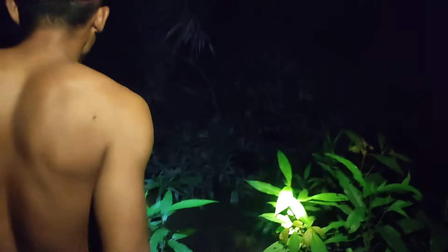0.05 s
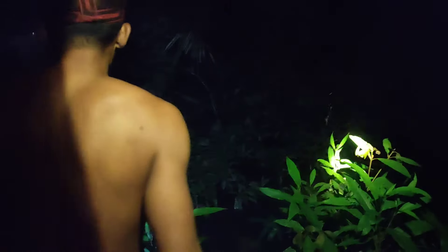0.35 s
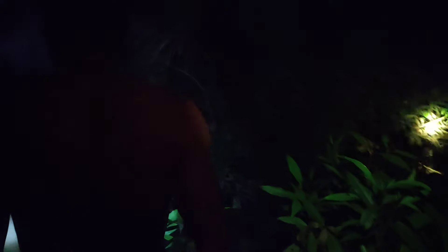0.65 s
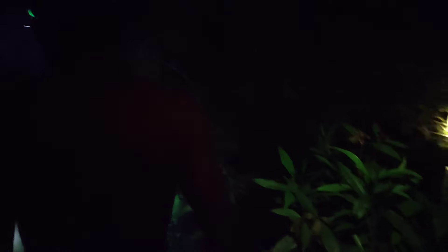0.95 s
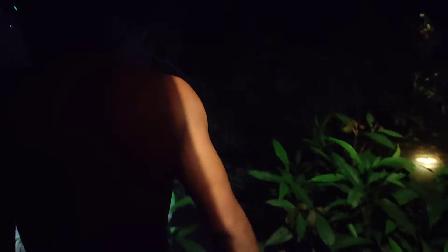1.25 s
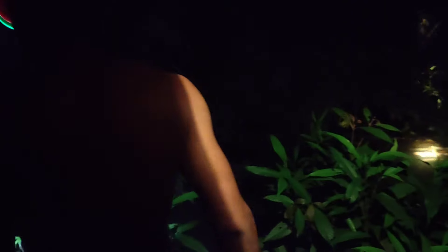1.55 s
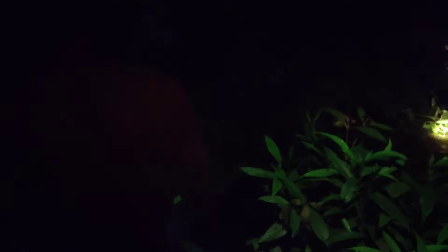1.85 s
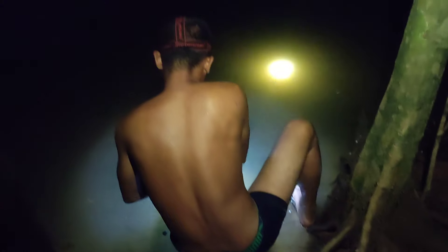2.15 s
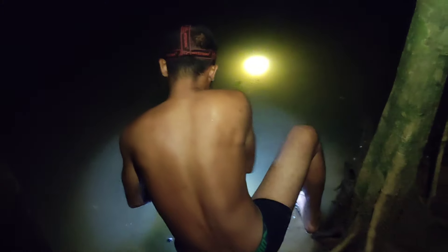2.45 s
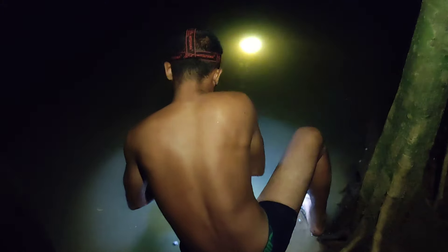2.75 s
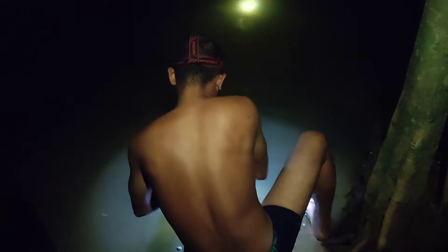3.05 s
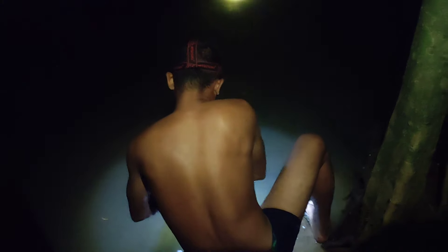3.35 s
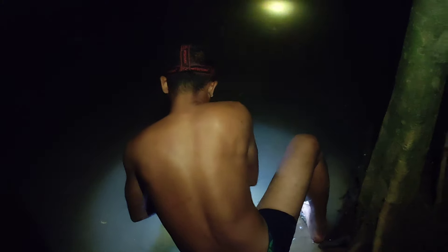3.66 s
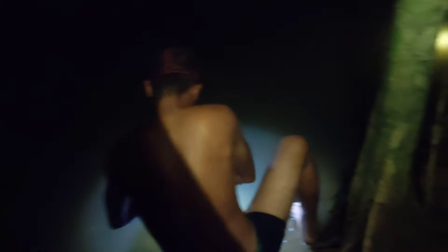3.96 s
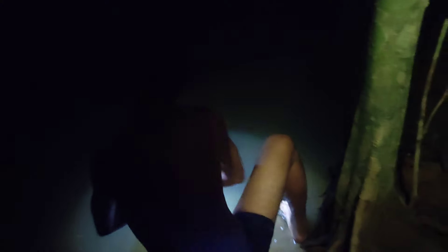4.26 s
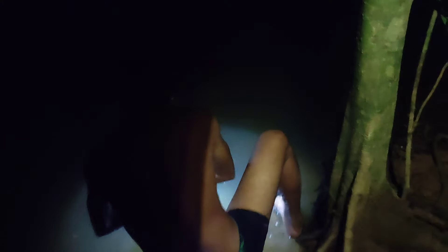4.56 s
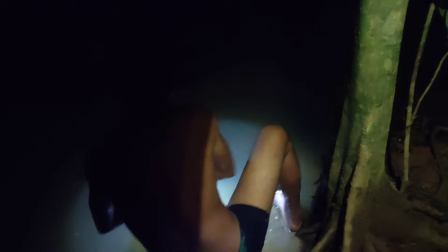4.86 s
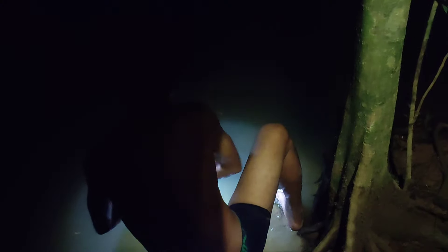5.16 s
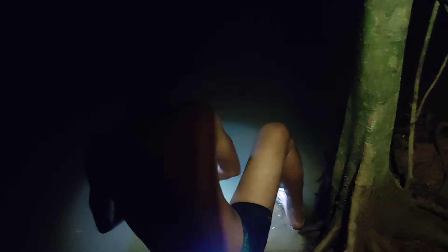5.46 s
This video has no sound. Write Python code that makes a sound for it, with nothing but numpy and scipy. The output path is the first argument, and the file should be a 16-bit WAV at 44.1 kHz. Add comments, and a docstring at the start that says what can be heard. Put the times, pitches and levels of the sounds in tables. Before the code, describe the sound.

A shrill night chorus of katydids and crickets spreads wide around the microphone, with far, short falling chirps and a soft wash of stream behind it. A close insect rattle gives way to fast ticking on the left, a twig click and a single close wooden knock. After an abrupt change the insects are slightly softer, then swell again, with scattered little water plops and one louder plop near the end.

```python
"""Night in a forest. On a path, a katydid chorus hisses, scraping wing on wing; one rattles close by
as leaves rustle, then another ticks on the left. Twigs click; wood knocks once, with a dull bump.
At 2 s the scene cuts to the bank of a pool: crickets and a high katydid trill, the chorus builds,
air pockets plop. Throughout, far callers repeat falling chirps and soft, low swells of noise
come and go over the wash of a stream."""
import sys
import numpy as np
from scipy import signal
from scipy.fft import rfft, irfft, next_fast_len
from scipy.io import wavfile
from scipy.ndimage import uniform_filter1d

SR = 44100
rng = np.random.default_rng(int(sys.argv[2]) if len(sys.argv) > 2 else 0)


def unload_audio(sound):
    """Save the sound as a 16-bit wav file, at the path given as the first command line argument."""
    columns = np.transpose(np.atleast_2d(sound))
    # keep every value between -1 and 1, then stretch to whole-number steps
    steps = np.round(np.clip(columns, -1, 1) * 32767)
    wavfile.write(sys.argv[1], SR, steps.astype(np.int16))


N = 247401
T = np.arange(N) / SR
CUT_S = 2.016  # path to bank
TICK_START_S, TICK_PERIOD_S = .5676, .015519

# chorus contour on the path: t/s, relative level/dB
PATH_LEVEL = [(0.48, -42.5), (0.56, -42), (0.68, -44), (0.8, -41.5), (1.1, -42.5), (1.36, -42.5),
              (1.48, -41.5), (1.96, -41.5)]
# spectra of both choruses and the rattle: f/Hz, relative density/dB, left minus right/dB
PATH_COLOUR = [(3170, -41, -4), (4200, -18.5, -10), (5130, -25, -3), (5400, -15, -7.5), (6480, -4.5, 9.5),
               (6780, -10, -17), (7030, -4.5, 5), (7570, -1.5, 3), (7840, 1.5, 2), (8250, -4, 11),
               (8800, -6.5, 21), (9160, -7.5, 11), (9570, -15, 4), (10400, -13, -4), (11500, -18, 4),
               (14300, -20, 6)]
BANK_COLOUR = [(3240, -58, 18), (5140, -35, 5), (5400, -16, -3), (5900, -25, 0), (6510, -12, -5),
               (6800, -8, -6), (7080, -2, 0.5), (7280, -1, -10), (8000, 0, 2), (7920, -2, -1),
               (8560, -4, 11), (9010, -8, 12), (9200, -10, 2), (9860, -13, -5), (11040, -19, -1),
               (12700, -24.5, 2), (14100, -35, 7)]
RATTLE_COLOUR = [(5400, -33, -1), (6000, -36, 0), (6660, -31, -7), (7050, -6, -12), (7470, 8.5, -13),
                 (7690, -2, -12), (7900, 9, 16), (8160, -3, 17), (8350, 1, 15), (9000, -4.5, 5),
                 (9500, -17, 9), (9700, -7, 0), (10200, -14.5, -5), (10700, -12, -2), (11400, -23, -1),
                 (11900, -18, 2), (14000, -15, 1)]
# hardest strokes of the left katydid: t/s, relative level/dB
HARD_TICKS = [(0.832, -31), (0.9558, -29), (1.0816, -27), (1.113, -30), (1.3487, -32), (1.5517, -28.5),
              (1.6616, -32), (1.757, -28.5), (1.8666, -30.5)]
# narrow bands of katydid hiss, one on the left of the path, two on the bank: t/s, f/Hz, level/dB
LEFT_BAND = [(0.66, 8700, -48.5), (0.84, 8650, -43.5), (0.96, 8250, -41), (1.081, 8150, -41.5),
             (1.2, 8750, -42.5), (1.34, 9050, -51.5), (1.46, 8150, -45), (1.6, 7980, -53), (2.0, 7870, -46)]
LOW_BAND = [(2.05, 7470, -53), (3.05, 7430, -53), (3.55, 7390, -53), (3.75, 7280, -50.5), (4.1, 7380, -47),
            (4.3, 7630, -56), (5, 7520, -57), (5.6, 7520, -62)]
HIGH_BAND = [(2.05, 8770, -58), (3.6, 8840, -56), (4.6, 8850, -54), (5.35, 8880, -49.5), (5.6, 8850, -55)]
# trills of crickets and (last row) one high, fast-pulsing katydid:
# start/s, end/s, f/Hz, pulse rate/Hz, depth/1, level/dB, left minus right/dB, jitter/1
TRILLS = [(-.2, 2.1, 4400, 65, .6, -65, -2.5, .018), (-.2, 2.1, 4485, 89, .7, -67.5, -4, .009),
          (-.2, 2.1, 4574, 71, .4, -67, -4, .004), (-.2, 2.1, 4860, 58, .5, -70, 0, .009),
          (2, 6.2, 4433, 82, .8, -68.5, -4, .006), (2, 6.2, 4515, 62, .8, -69.5, 1, .024),
          (2.35, 3.4, 4790, 52, .6, -73, -1, .008), (2.08, 3.83, 5221, 46.2, 1, -62.5, -2, .0006),
          (2.05, 3.7, 5230, 39, .8, -71, 0, .009), (2, 3.9, 5686, 45, .9, -62.5, -1, .0008),
          (2.2, 4.1, 5723, 35, .5, -66, -1, .0015), (3.8, 4.75, 5790, 43, .7, -65.5, -1, .003),
          (4.6, 6.2, 5730, 43, .5, -68.5, -1, .007), (2, 6.2, 7465, 130, .9, -57, -3, .004)]
# far calls: t/s, starting f/Hz, level/dB, roughness/1
CALLS = [(.11, 2120, -63.5, 0.8), (.26, 2270, -56, .7), (.78, 2143, -60, 0.07), (.92, 2265, -56, 0.4),
         (.98, 2178, -58, 0.47), (1.49, 2134, -62, 0.26), (1.61, 2213, -57, 0.5), (2.3, 2253, -55, 0.76),
         (2.42, 2120, -53, 0.34), (3, 2250, -58.5, 0.4), (3.16, 2137, -51, 0.35), (3.68, 2286, -58.5, 0.33),
         (3.88, 2125, -53, 0.17), (4.05, 2350, -62, 0.2), (4.32, 2292, -57, 0.17), (4.45, 2210, -59.5, .4),
         (4.59, 2154, -53, 0.32), (4.99, 2227, -57, 0.23), (5.31, 2166, -52, 0.33)]
# air pockets: t/s, f/Hz, initial glide/(octaves/s), t60/s, level/dB
AIR_POCKETS = [(2.206, 1050, 5, 0.045, -47), (2.249, 282, 2, 0.05, -49), (2.265, 683, 6, 0.1, -48),
               (2.273, 930, 7.5, 0.076, -42), (2.275, 1520, 20, .04, -44.5), (2.291, 1785, 2.5, 0.08, -41),
               (2.534, 1470, 0, 0.058, -50), (3.055, 1033, -1, 0.078, -50.5), (3.058, 600, 6, 0.034, -50),
               (4.359, 470, 10, .022, -31), (4.3596, 615, 22, 0.048, -25), (4.905, 408, -19, 0.12, -49.5),
               (5.439, 293, -11, 0.09, -41), (5.439, 594, -2, .02, -47)]
# soft, low swells of noise: t/s, length/s, level/dB, f/Hz
SOFT_SWELLS = [(0.666, .33, -69.5, 1097), (2.1, 0.32, -68.5, 944), (2.783, .33, -63.5, 750),
               (4.25, .16, -65.5, 577), (4.548, 0.34, -65, 620)]
# modes of the wood: f/Hz, t60/s, level/dB
WOOD_MODES = [(520, 0.0097, -48), (1220, 0.015, -36), (1790, 0.023, -28.5), (2020, 0.02, -36),
              (2390, .012, -39), (4380, .024, -35), (4880, .019, -38)]
# twig clicks and water slaps: t/s, level/dB, rise/s, decay/s, body f/Hz, crack/dB, crack f/Hz,
# bass/dB, snap/dB (crack, bass and snap relative to the body)
IMPACTS = [(0.192, -46, 0.00072, 0.0013, 1140, 5, 4600, -23, -20),
           (0.206, -46.5, 0.0031, 0.0045, 1160, 12.5, 4100, -5, -20),
           (0.669, -48.5, 0.0037, 0.004, 990, -16, 4500, -1, -20),
           (1.611, -39.5, 0.007, 0.0037, 1600, 3.5, 4000, -8, 0.5),
           (2.246, -48, .001, 0.003, 955, -18, 3990, -7, -20),
           (2.272, -48, .003, 0.008, 1070, -25, 4000, -20, -20),
           (2.292, -46.5, .002, 0.005, 1610, -22, 4000, -16, -20),
           (2.3, -48.5, .002, .006, 1000, -22, 4000, -16, -20),
           (4.352, -47, .004, 0.0054, 2400, 5, 6240, -5, -20),
           (4.3575, -30, .002, 0.0022, 492, -7, 6400, -1, 1),
           (4.563, -56.5, .005, 0.004, 680, -18, 4120, 5, -20),
           (5.4385, -44, 0.00064, 0.004, 1050, -7, 4040, -2, -8)]
# brushed leaves: t/s, length/s, level/dB
BRUSHES = [(-0.063, 0.35, -61)]
# hand bumps: t/s, f/Hz, t60/s, level/dB
HAND_BUMPS = [(1.734, 164, 0.035, -36), (1.742, 51, 0.095, -46.5), (4.362, 44, 0.16, -43)]
# spectrum of stream and far insects: f/Hz, relative density/dB
WASH_COLOUR = [(20, 9), (60, -5), (92, 0), (130, -7.5), (350, -8.5), (700, -12), (1700, -13.5), (2100, -6),
               (2700, -5), (3250, -13.5), (3650, -6.5), (4150, -16), (4600, -21), (5000, -12)]
# their likeness in both ears: f/Hz, correlation/1
WASH_CORRELATION = [(30, 0), (90, 0.77), (600, 0.6), (1200, 0.08), (2200, 0.085), (8000, 0)]


def chorus(level_db, colour, strokes_per_s, spread_db, hiss_db, patchy_db, voices=16):
    """Katydids: many uneven wing strokes over the hiss of the farthest singers."""
    strokes = np.zeros((2, N))
    for _ in range(voices):
        stroke = wing_stroke(rng.uniform(.00068, .00356), rng.uniform(5110, 7420),
                             rng.uniform(7360, 13770))
        onsets = rng.random(N) < strokes_per_s / voices / SR
        sizes = gain_of(spread_db * np.minimum(rng.exponential(1, N), 3.5))
        voice = signal.oaconvolve(onsets * sizes, stroke)[:N]
        strokes += [voice, np.roll(voice, rng.integers(-25, 25))]
    hiss = gain_of(hiss_db) * rng.standard_normal((2, N))
    swarm = (evened(strokes) + hiss) * gain_of(.5 * drift(60))
    return tinted(swarm, colour, patchy_db) * gain_of(level_db)


def wing_stroke(length_s, from_hz, to_hz):
    """A scraper runs along the wing's file: a short swept tone."""
    u = np.linspace(0, 1, max(int(length_s * SR), 8))
    return np.sin(np.pi * u) ** 2 * tone(from_hz + (to_hz - from_hz) * u)


def katydid_rattle(end_s=.54, gap_s=.007, level_db=-44.8, rasp_db=7.5, rasp_db_per_s=5):
    """Close katydid, about 40 syllables/s, slowing as it tires: pitch up on opening, down on closing."""
    out, t = np.zeros((2, N)), np.arange(SR // 25) / SR
    for s in beats(0, end_s, period_s=.0238, slowing_s=.00013):
        opening = wing_stroke(.009, 6400 * rng.uniform(.96, 1.04), 9500 * rng.uniform(.95, 1.05))
        closing = wing_stroke(.007, 9500 * rng.uniform(.95, 1.05), 6200 * rng.uniform(.96, 1.04))
        add(out, s - .003, opening)
        add(out, s - .002 + gap_s * rng.uniform(.9, .98), closing)
        # uneven teeth of the file
        rasp = rng.standard_normal((2, len(t))) * np.exp(-t / .0075) * np.minimum(t / .0026, 1)
        add(out, s - .003, gain_of(rasp_db + rasp_db_per_s * s) * rasp)
    release = gain_of(-6 * np.clip(1 + (T - end_s) / .075, 0, 1))
    echoed = trees(out * release, t60_s=.05, wet_db=-4.5)
    return gain_of(level_db) * tinted(echoed, RATTLE_COLOUR, patchy_db=2.2)


def katydid_ticks(catch_share=.35, catch_db=-32, graze_db=-43, spread_db=1.2, jitter_s=.0008):
    """Left katydid, about 64 strokes/s: most graze the file, those that catch tick."""
    out = np.zeros((2, N))
    strokes = [(s, db + 1) for s, db in HARD_TICKS]
    for s in beats(TICK_START_S, CUT_S, TICK_PERIOD_S, slowing_s=.0000032):
        db = (catch_db if rng.random() < catch_share else graze_db) + spread_db * rng.standard_normal()
        strokes.append((s + jitter_s * rng.standard_normal(), db))
    for s, db in strokes:
        add(out, s, gain_of(db) * wing_stroke(.00295, 7310, 9200 * rng.uniform(.97, 1.03)) * pan(16))
    return trees(out, t60_s=.04, wet_db=-9)


def left_hiss(depth=.26):
    """Narrow, throbbing band of katydid hiss on the left, swelling and shifting as the microphone moves."""
    throb = 1 + depth * np.cos(2 * np.pi * (T - TICK_START_S) / TICK_PERIOD_S)
    return hiss_band(LEFT_BAND, width_hz=600) * throb * pan(13)


def bank_katydids():
    """A low and a high group stand out in turn from the chorus."""
    return hiss_band(LOW_BAND, width_hz=410) * pan(-3.5) + hiss_band(HIGH_BAND, width_hz=420) * pan(8)


def hiss_band(curve, width_hz):
    """Narrow noise band following a curve of centre frequency and level."""
    s, hz, db = np.transpose(curve)
    lowpass = signal.butter(2, width_hz / 2, fs=SR, output="sos")
    baseband = signal.sosfilt(lowpass, rng.standard_normal((2, N)) + 1j * rng.standard_normal((2, N)))
    carrier = np.exp(2j * np.pi * np.cumsum(np.interp(T, s, hz)) / SR)
    return evened((baseband * carrier).real) * gain_of(np.interp(T, s, db))


def insect_trills(sag_hz=110, skew=.7, sharpness=2.5, grain=.056, waver_db=1.4):
    """Crickets and one high katydid: each wing closure is a tone pulse that swells and sags in pitch."""
    out = np.zeros((2, N))
    for start_s, end_s, hz, rate_hz, depth, db, side_db, jitter in TRILLS:
        cycle = np.cumsum(rate_hz * (1 + .003 * drift(8))) / SR % 1
        pitch_hz = hz * (1 + jitter * drift(120)) + depth * sag_hz * (1 - 2 * cycle)
        pulse = 1 - depth + depth * np.sin(np.pi * cycle ** skew) ** sharpness
        song = evened(pulse * tone(pitch_hz)) * (1 + grain * drift(300))  # uneven teeth
        gate = np.clip(np.minimum((T - start_s) / .049, (end_s - T) / .13), 0, 1)
        out += gain_of(db + waver_db * drift(20)) * gate * song * pan(side_db)
    return trees(out, t60_s=.25, wet_db=-4)


def far_callers(echo_s=.085, echo_db=-11, neighbours=4, neighbour_db=-64):
    """Each chirp echoes across the pool; farther, higher neighbours join, smeared by the forest."""
    near, far = np.zeros((2, 2, N))
    for s, hz, db, rough in CALLS:
        call = gain_of(db) * chirp(hz, rough)
        add(near, s, call)
        add(near, s + echo_s, gain_of(echo_db) * call)
        for late, higher in rng.random((neighbours, 2)):
            add(far, s + .14 * late - .08, gain_of(neighbour_db) * chirp(hz * (1 + .092 * higher), rough))
    return trees(near, t60_s=.4, wet_db=-7) + trees(far, t60_s=.5, wet_db=6)


def chirp(start_hz, rough, length_s=.13, fall_share=.0891, quaver_share=.03):
    """A rough, quavering whistle slides down and levels out."""
    u = np.linspace(0, 1, int(length_s * SR))
    flutter, quaver = evened(band(rng.standard_normal((2, len(u))), 20, 150))
    glide_hz = start_hz * (1 - fall_share * np.sin(np.pi / 2 * u) ** 2)
    envelope = abs(np.sin(np.pi * u)) ** .8 * (1 + rough * flutter) / np.hypot(1, rough)
    return envelope * tone(glide_hz * (1 + quaver_share * rough * quaver))


def bubbles(settle_share=.42):
    """An air pocket rings and glides as it nears the surface, then its pitch settles."""
    out, t = np.zeros((2, N)), np.arange(SR // 10) / SR
    for s, hz, octaves_per_s, t60_s, db in AIR_POCKETS:
        settle_s = settle_share * t60_s
        octaves = octaves_per_s * settle_s * np.tanh(t / settle_s)
        ring = -tone(hz * 2 ** octaves) * (1 - np.exp(-t / .0003))
        add(out, s, gain_of(db - 60 * t / t60_s) * ring * pan(-5.5))
    return trees(out, t60_s=.16, wet_db=-25)


def soft_swells(count=150, spread_octaves=.565, octaves_per_s=3, t60_s=.027, crest_share=.7):
    """Soft, low swells of noise, each a blur of tiny damped tones."""
    out, t = np.zeros((2, N)), np.arange(SR // 20) / SR
    for start_s, length_s, db, hz in SOFT_SWELLS:
        swell = np.zeros((1, int(length_s * SR) + len(t)))
        for _ in range(count):
            octaves = spread_octaves * rng.uniform(-2.05, 1.33) + octaves_per_s * t
            grain = tone(hz * 2 ** octaves) * (1 - np.exp(-t / .0004))
            onset_s = length_s * rng.triangular(0, crest_share, 1)
            add(swell, onset_s, grain * gain_of(2 * rng.standard_normal() - 60 * t / t60_s))
        add(out, start_s, gain_of(db) * evened(swell) * pan(-3))
    return trees(out, t60_s=.2, wet_db=-8)


def wood_knock(at_s=1.734, contact_s=.00021, push_db=-26.5, scrape_db=-32.5):
    """One close knock: contact push, short ring, gritty scrape."""
    out, t = np.zeros((2, N)), np.arange(SR // 10) / SR
    push = gain_of(push_db) * np.exp(-(t / contact_s - np.pi) ** 2 / 2)
    ring = sum(gain_of(db - 60 * t / t60_s) * np.sin(2 * np.pi * hz * t) for hz, t60_s, db in WOOD_MODES)
    grit = evened(band(rng.standard_normal((2, len(t))), 3200, 12000, order=1))
    scrape = gain_of(scrape_db) * grit * burst(t, rise_s=.001, decay_s=.002)
    add(out, at_s, (ring - push + scrape) * pan(2))
    return trees(out, t60_s=.1, wet_db=-16)


def clicks(snap_s=.001):
    """Twigs and water slaps: a burst excites a body resonance, bright crack, dull push and thin snap."""
    out, t = np.zeros((2, N)), np.arange(SR // 15) / SR
    for s, db, rise_s, decay_s, body_hz, crack_db, crack_hz, bass_db, snap_db in IMPACTS:
        noise = rng.standard_normal((6, len(t)))
        body = evened(band(noise[0] + .5 * noise[1:3], .88 * body_hz, 1.39 * body_hz))
        bass = gain_of(bass_db) * evened(band(noise[3], 214, 710))
        crack = gain_of(crack_db) * evened(band(noise[4:], 1.005 * crack_hz, 1.28 * crack_hz))
        snap = gain_of(snap_db) * evened(band(noise[1] + noise[4:], 6000, 14000))
        click = (body + bass + crack) * burst(t, rise_s, decay_s) + snap * burst(t, rise_s, snap_s)
        add(out, s, gain_of(db) * click)
    return trees(out, t60_s=.1, wet_db=-12)


def leaves(crackles_per_s=1500, spread_db=.5):
    """A brushed bush: a short swell of tiny crackles."""
    swell = sum(gain_of(db) * np.sin(np.pi * np.clip((T - s) / length_s, 0, 1))
                for s, length_s, db in BRUSHES)
    onsets = rng.random(N) < crackles_per_s / SR
    crackles = onsets * rng.standard_normal(N) * gain_of(spread_db * rng.exponential(1, N))
    return trees(swell * evened(band(crackles, 520, 2600, order=1)) * pan(1), t60_s=.1, wet_db=-6)


def hand_bumps():
    """A hand knocks softly on the microphone: low, damped swings."""
    out, t = np.zeros((2, N)), np.arange(SR // 4) / SR
    for s, hz, t60_s, db in HAND_BUMPS:
        add(out, s, gain_of(db - 60 * t / t60_s) * np.sin(2 * np.pi * hz * t))
    return out


def forest(path_db=-57, bank_db=-53.5, drone_db=-73):
    """Wash of stream and far insects, nearer on the bank, over a low drone."""
    size = next_fast_len(N, True)
    hz = np.fft.rfftfreq(size, 1 / SR)
    left, other = rfft(rng.standard_normal((2, size)))
    correlation = read(WASH_CORRELATION, hz)
    right = correlation * left + np.sqrt(1 - correlation ** 2) * other
    wash = irfft(np.array([left, right]) * gain_of(read(WASH_COLOUR, hz)), size)[:, :N]
    drone = gain_of(drone_db) * evened(band(rng.standard_normal(N), 87, 97))
    return evened(wash) * gain_of(np.where(T < CUT_S, path_db, bank_db) + drift(18)) + drone


def trees(x, t60_s, wet_db):
    """Adds echoes off leaves and trunks, different in each ear."""
    t = np.arange(SR // 2) / SR
    taps = rng.standard_normal((2, len(t))) * (rng.random((2, len(t))) < .1) * gain_of(-60 * t / t60_s)
    taps /= np.linalg.norm(taps, axis=1, keepdims=True)
    wet = gain_of(wet_db)
    return (x + wet * signal.fftconvolve(x, taps, axes=1)[:, :N]) / np.hypot(1, wet)


def tinted(x, colour, patchy_db):
    """Shapes spectrum and balance at rms 1; moving reflections leave drifting peaks and dips."""
    hz, _, spectra = signal.stft(x, SR, nperseg=1024, noverlap=768)
    colour = np.array(colour, float)
    patches = uniform_filter1d(rng.standard_normal(spectra.shape), size=4, axis=1)
    patches = evened(uniform_filter1d(patches, size=40, axis=2))
    gain = gain_of(read(colour[:, :2], hz)) * pan(read(colour[:, ::2], hz))
    spectra = spectra * gain[..., None] * gain_of(patchy_db * patches)
    return evened(signal.istft(spectra, SR, nperseg=1024, noverlap=768)[1][:, :N])


def beats(start_s, end_s, period_s, slowing_s):
    """Stroke times; the period grows by slowing_s per stroke."""
    k = np.arange(int((end_s - start_s) / period_s) + 1)
    times = start_s + period_s * k + slowing_s * k ** 2 / 2
    return times[times < end_s]


def burst(t, rise_s, decay_s):
    """Envelope of a blow."""
    return np.minimum(t / rise_s, 1) ** 2 * np.exp(-np.maximum(t - rise_s, 0) / decay_s)


def tone(hz):
    """Sine following a pitch curve."""
    return np.sin(2 * np.pi * np.cumsum(hz) / SR)


def drift(rate_hz):
    """Random wander of rms 1, up to about rate_hz."""
    knots = rng.standard_normal(4096)
    return evened(np.interp(T * rate_hz * 2, np.arange(len(knots)), knots))


def band(x, lo_hz, hi_hz, order=2):
    """Causal band-pass."""
    return signal.sosfilt(signal.butter(order, [lo_hz, hi_hz], "band", fs=SR, output="sos"), x)


def gain_of(db):
    """Decibels to a factor."""
    return 10 ** (np.asarray(db) / 20)


def evened(x):
    """Scales to rms 1."""
    return x / np.sqrt(np.mean(x ** 2) + 1e-20)


def read(points, hz):
    """Interpolates a table over log frequency."""
    f, value = np.transpose(points)
    return np.interp(np.log(hz + 1), np.log(f + 1), value)


def pan(db):
    """Stereo gains for left minus right in dB, mean power 1."""
    pair = np.array([np.atleast_1d(gain_of(db / 2)), np.atleast_1d(gain_of(-db / 2))])
    return pair / np.sqrt((pair ** 2).mean(0))


def add(mix, s, sound):
    """Mixes a sound in at time s."""
    part = mix[:, max(round(s * SR), 0):][:, :sound.shape[-1]]
    part += sound[..., :part.shape[1]]


def scene(build_s=2.15):
    """The path, then the bank of the pool."""
    path_db = 1 + np.interp(T, *np.transpose(PATH_LEVEL))
    bank_db = np.interp(T, [CUT_S, CUT_S + build_s], [-47, -42.5])
    path = chorus(path_db, PATH_COLOUR, strokes_per_s=770, spread_db=3.5, hiss_db=8, patchy_db=1.8)
    bank = chorus(bank_db, BANK_COLOUR, strokes_per_s=670, spread_db=-7, hiss_db=24.5, patchy_db=1.3)
    path += katydid_rattle() + katydid_ticks() + left_hiss()
    bank += bank_katydids()
    animals = np.where(T < CUT_S, path, bank) + insect_trills() + far_callers()
    incidents = soft_swells() + bubbles() + clicks() + wood_knock() + leaves() + hand_bumps()
    return animals + incidents + forest()


def record(dry, fade_s=.015, cutoff_hz=14350):
    """Brief level dip at the cut, then a low-pass."""
    fade = np.where(T < CUT_S, 1, np.clip((T - CUT_S) / fade_s, .2, 1))
    lowpass = signal.firwin(511, cutoff_hz, window=("kaiser", 9), fs=SR)
    return signal.oaconvolve(dry * fade, lowpass[None], "same")


dry = scene()
out = record(dry)
unload_audio(out)
```